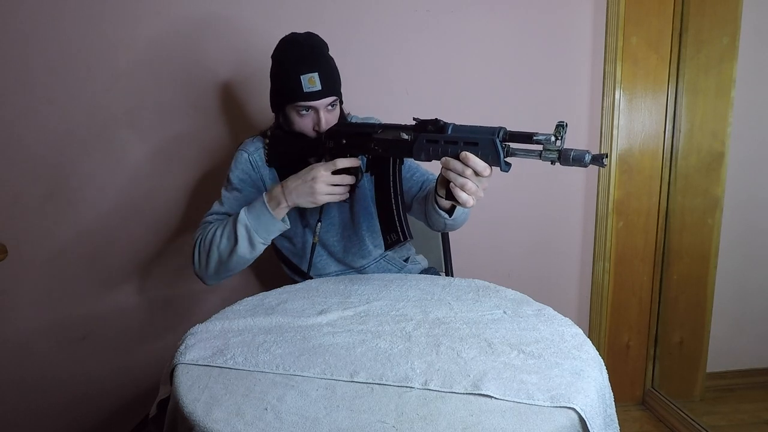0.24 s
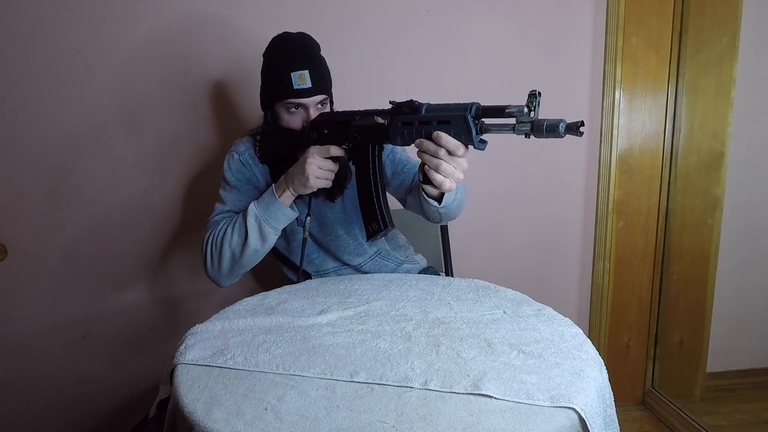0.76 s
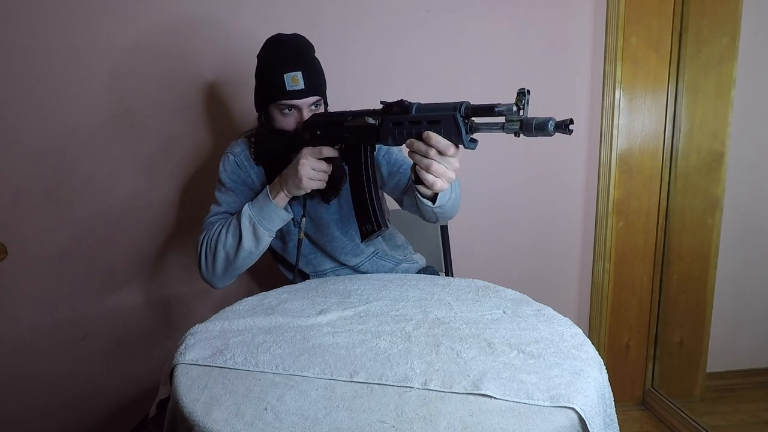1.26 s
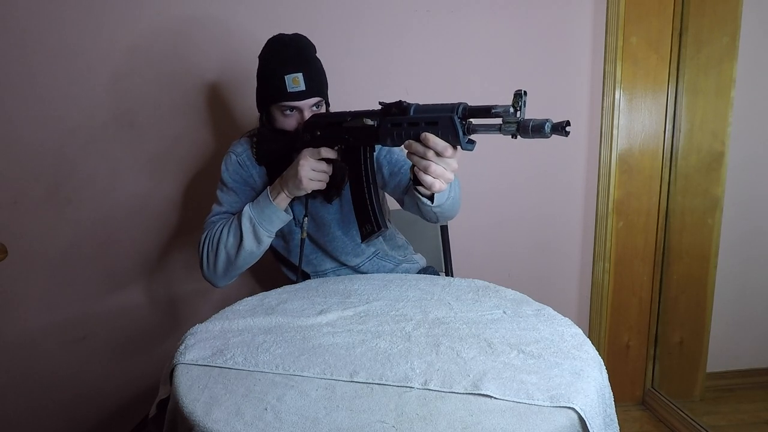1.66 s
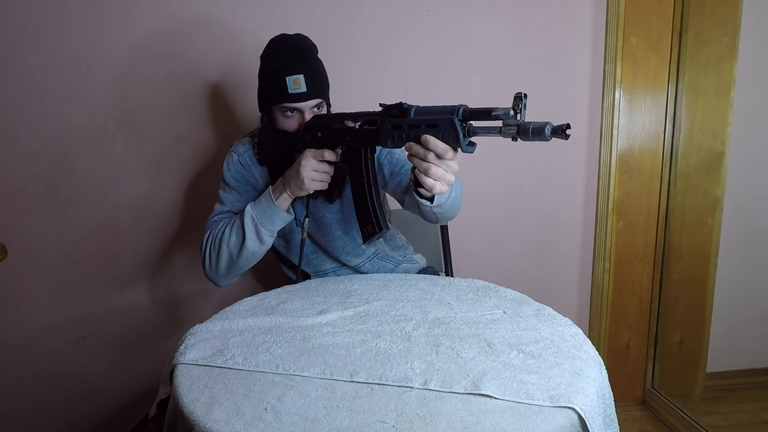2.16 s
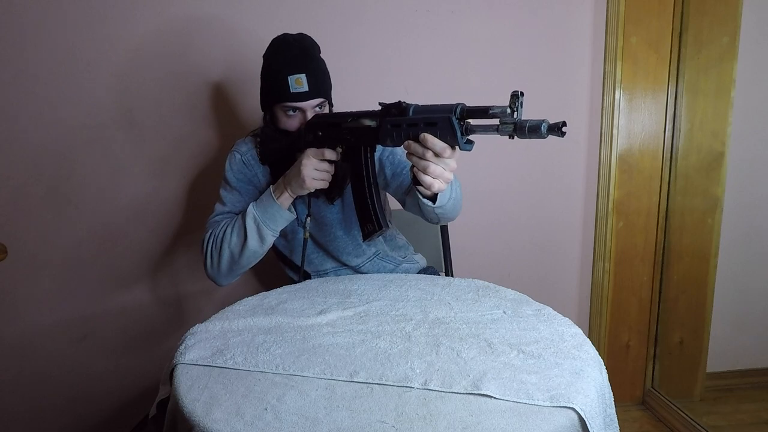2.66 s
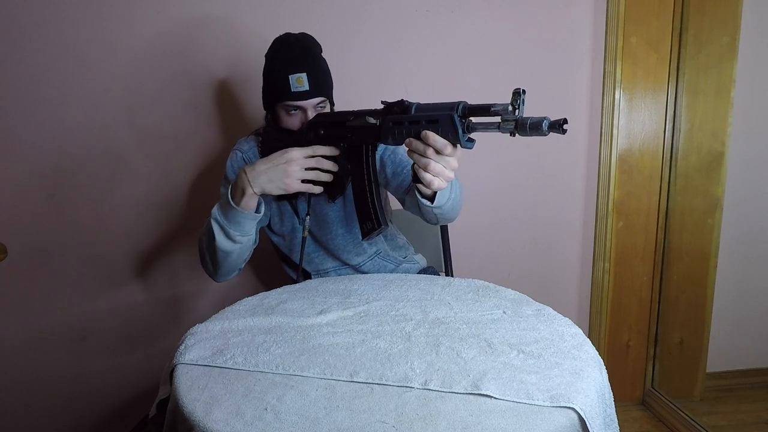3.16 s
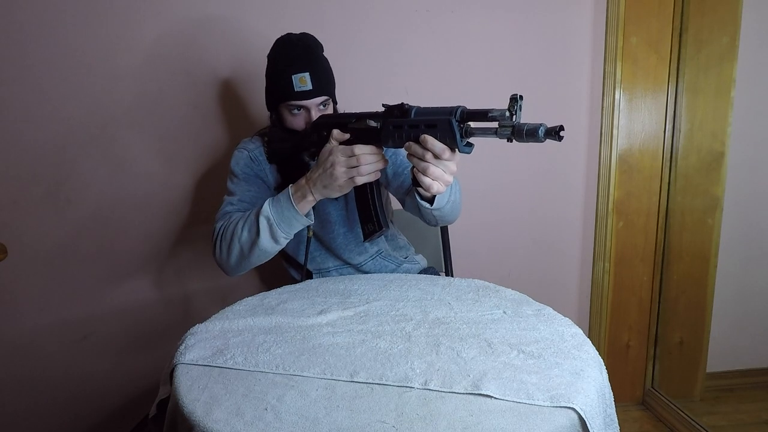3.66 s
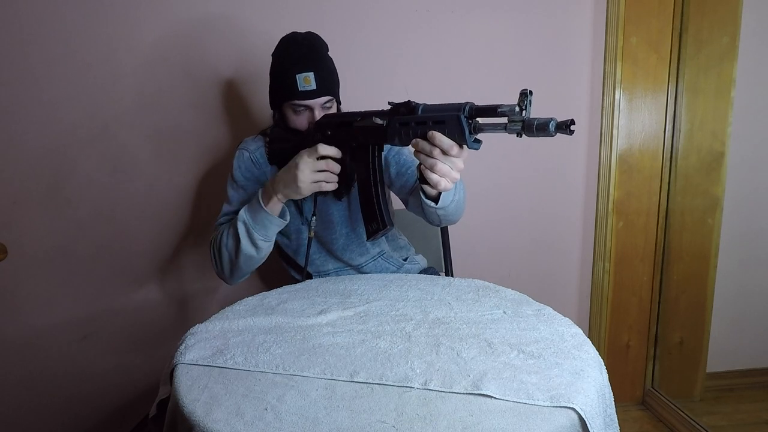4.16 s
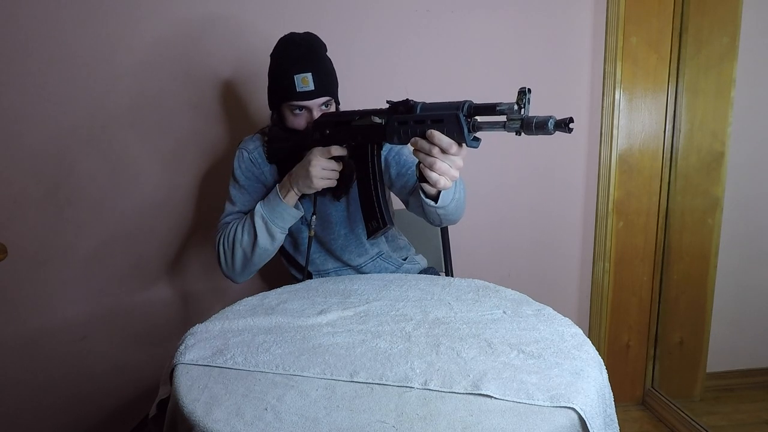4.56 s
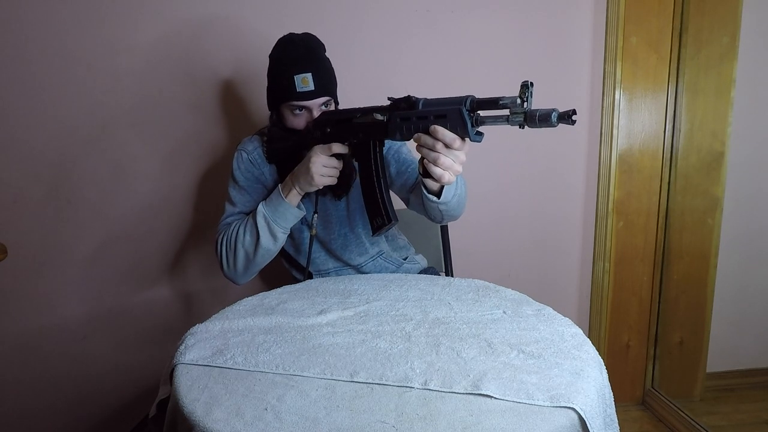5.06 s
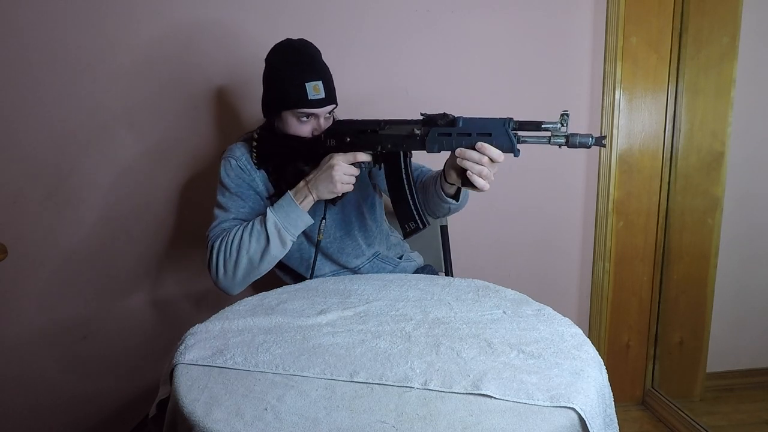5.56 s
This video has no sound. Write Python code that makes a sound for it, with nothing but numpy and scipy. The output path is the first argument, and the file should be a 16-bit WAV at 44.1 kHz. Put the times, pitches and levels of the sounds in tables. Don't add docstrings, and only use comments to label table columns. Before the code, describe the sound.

In a small bare room, hands knock a hollow plastic rifle stock, then a gas airsoft rifle fires three rapid bursts of four or five clattering shots. After a pause a selector lever snaps, followed by three quick single shots and one more. Close stereo camera microphone, overloaded by the cracks, with hiss that sinks after each blast.

```python
import sys
import numpy as np
from scipy import signal
from scipy.fft import rfft, irfft
from scipy.io import wavfile
from scipy.ndimage import uniform_filter1d

SR = 44100
rng = np.random.default_rng(int(sys.argv[2]) if len(sys.argv) > 2 else 0)


def invert_db(x):
    u = np.asarray(x, float) / 20
    return 10 ** u


def output_pcm(signal):
    pcm = np.clip(np.atleast_2d(signal).T, -1, 1) * 32767
    wavfile.write(sys.argv[1], SR, np.round(pcm).astype(np.int16))


N = 256220

# start_s, knock_db, crack_db
CYCLES = [(1.3202, 0.5, -1.5), (1.3949, -5.5, -2), (1.4685, -4.5, -1), (1.5423, -7, -1.5),
          (1.9556, -16, 0.5), (2.0300, -4.5, -1), (2.1035, -5.5, -3), (2.1765, -3.5, -4),
          (2.5657, -19.5, -1), (2.6401, -2.5, -2), (2.7146, -4.5, -4), (2.7876, -6, -3),
          (2.8613, -4.5, -2.5), (4.612, -0.5, -2.5), (4.8512, -13.5, 0.5), (5.0851, -12.5, 0.5),
          (5.7796, -9, 2)]
CRACK_LAG_S = .0180


def evened(x):
    return x / np.sqrt(np.mean(x ** 2) + 1e-20)


def read(points, hz):
    f, value = np.transpose(points)
    return np.interp(np.log(hz + 1), np.log(f + 1), value)


def add(mix, s, sound):
    part = mix[..., round(s * SR):][..., :sound.shape[-1]]
    part += sound[..., :part.shape[-1]]


def causal(spectrum):
    hz = abs(np.fft.fftfreq(4096, 1 / SR))
    log_gain = np.log(invert_db(np.maximum(read(spectrum, hz), -80)))
    return np.fft.ifft(np.exp(np.conj(signal.hilbert(log_gain)))).real[:1024]


def burst(colour, length_s, snap):
    t = np.arange(3000) / SR
    drive = np.zeros((2, 3000))
    drive[0] = rng.standard_normal(3000) * np.exp(-t / length_s)
    drive[0, 0] -= snap
    drive[1, 0] = np.linalg.norm(drive[0])
    sound = signal.fftconvolve(drive, colour[None], axes=1)
    return sound / abs(sound[0]).max()


def ring(modes, spread, phase, rise_s):
    t = np.arange(SR // 3)[:, None] / SR
    hz, db, t60 = np.transpose(modes)
    chance = rng.standard_normal((3, len(hz)))
    waves = np.sin(2 * np.pi * hz * (1 + spread * chance[0]) * t + phase * chance[1])
    levels = invert_db(db + 2.2 * chance[2] - 60 * t / t60)
    return (levels * waves).sum(1) * (1 - np.exp(-t[:, 0] / rise_s)) / 2


def ducking_db():
    step_db, most_db, fall_s, back_s = 17.5, 24, 0.26, 0.55
    age = np.maximum(np.arange(N)[::64, None] / SR - np.transpose(CYCLES)[0] - CRACK_LAG_S, 0)
    push = step_db * ((1 - np.exp(-age / fall_s)) * np.exp(-age / back_s)).sum(1)
    return np.repeat(most_db * np.tanh(push / most_db), repeats=64)[:N]


def wind_filter():
    off_s, fade_s = 1.6, 0.23
    return np.exp(-np.maximum(np.arange(N) / SR - off_s, 0) / fade_s)


def noise(spectrum, level_db):
    # pitch_hz, likeness
    likeness = [(60, 0.77), (180, -0.19), (550, -0.78), (1650, -0.59), (4970, 0.31), (15000, -1.2)]
    frames, hz = N // 256 + 5, np.fft.rfftfreq(1024, 1 / SR)
    a, b, c, d, patches = rng.standard_normal((frames, 513, 5)).T
    patches = evened(uniform_filter1d(uniform_filter1d(patches, 8, 0), 10, 1))
    same = np.clip(read(likeness, hz), -1, 1)[:, None]
    left = a + 1j * b
    z = np.array([left, same * left + np.sqrt(1 - same ** 2) * (c + 1j * d)])
    z *= invert_db(read(spectrum, hz)[:, None] + 0.5 * patches)
    return invert_db(level_db) * evened(signal.istft(z, nperseg=1024, noverlap=768)[1][:, :N])


def room_noise():
    # pitch_hz, level_db (per Hz)
    hiss = [(53, -77.5), (90, -57), (138, -26.5), (165, -1), (204, -9.5), (288, -10), (527, -14.5),
            (1690, -23.5), (3220, -31), (3820, -31), (4260, -31.5), (5510, -34), (6270, -28.5),
            (12500, -37), (15500, -56.5)]
    # pitch_hz, level_db (per Hz)
    rumble = [(12, -35), (20, -6.5), (81, -11.5), (119, 3.5), (133, -4), (146, -20), (200, -34),
              (260, -44.5), (440, -120)]
    duck = ducking_db()
    rumble_db = -56.5 + 9 * (1 - wind_filter()) - 0.48 * duck
    return noise(hiss, -40.0 - duck) + noise(rumble, rumble_db)


def hammer_knock(length_s, snap):
    # pitch_hz, level_db (per Hz)
    hammer_colour = [(180, -52), (400, -7), (800, -5), (1300, 5.5), (2300, -4.5), (3000, -16), (3800, -10),
                     (5500, -16.5), (7500, -6.5), (9500, -33.5), (14000, -36)]
    return burst(causal(hammer_colour), length_s, snap)


def stock_knocks(bright):
    # start_s, level_db
    knocks = [
        (0.001, -17.5),
        (.073, -13),
        (0.0803, -6),
        (.099, -16.5),
    ]
    # pitch_hz, level_db, t60_s
    stock = [(460, -18, .03), (790, -2, .05), (862, 0, .07), (1050, -2, .05), (1200, -9, .03),
             (1350, -7, .03), (1570, -5, .07), (1700, -3, .05), (1950, -8, .03), (2230, -5, .04),
             (2400, -8, .03), (2620, -10, .03), (3000, -12, .03), (3450, -14, .03)]
    for s, db in knocks:
        add(bright, s, invert_db(db) * ring(stock, .005, 3.0, .0015) * invert_db([[0], [-4.0]]))
        add(bright, s, invert_db(db - 11.0) * hammer_knock(0.022, 1.5))


def small_ticks(bright):
    # start_s, level_db, centre_hz, width_hz, length_s
    ticks = [(.001, -34.5, 4450, 5970, 0.069), (0.074, -17.5, 5240, 5750, 0.0064),
             (5.444, -46, 494, 498, 0.03), (0.268, -26, 870, 605, 0.012), (0.387, -39.5, 1151, 1500, 0.093),
             (.509, -36, 1670, 2500, 0.024), (1.306, -15, 5860, 4020, 0.029),
             (1.945, -33.5, 6500, 3140, 0.015), (2.555, -36, 6080, 3000, 0.0048),
             (3.617, -56, 1080, 598, 0.018), (4.072, -49.5, 927, 70, 0.0071),
             (3.825, -48, 700, 900, 0.0042), (4.615, -8, 2600, 1210, 0.0035),
             (1.317, -11.5, 2670, 1500, 0.0024), (4.173, -41.5, 4760, 3500, 0.031),
             (4.178, -33.5, 1700, 800, 0.0094), (4.192, -40, 2150, 250, 0.0027),
             (4.372, -41, 1200, 1220, 0.013), (4.591, -15.5, 5180, 6100, 0.012),
             (5.752, -36, 5020, 6070, 0.011), (5.763, -30.5, 2950, 5000, 0.011)]
    t = np.arange(512) / SR
    for s, db, hz, width_hz, length_s in ticks:
        band = np.exp(-np.pi * width_hz * t) * np.cos(2 * np.pi * hz * t + 0.15)
        add(bright, s, invert_db(db) * burst(np.convolve(band, band), length_s, 0.98))


def chair_bumps(low):
    # start_s, level_db, pitch_hz, t60_s
    bumps = [
        (.23, -31, 167, 0.12),
        (0.397, -24.5, 161, 0.51),
        (0.522, -35.5, 164.6, 0.69),
        (0.818, -40, 172, 0.48),
        (4.48, -37.5, 174.5, 0.66),
        (5.449, -35, 267.4, 0.19),
        (5.449, -23.5, 169.5, 0.262),
        (5.469, -31, 166.3, 0.48),
        (5.454, -35.5, 76.9, 0.82),
    ]
    fade = np.hanning(2 * (SR // 3))[SR // 3:]
    for s, db, hz, t60 in bumps:
        add(low, s, 2 * invert_db(db) * ring([(hz, 0, t60)], 0.026, 0.036, 0.017) * fade)


def selector_clicks(bright):
    # start_s, level_db, length_s
    snaps = [
        (3.811, -24, 0.039),
        (3.8252, -1, 0.002),
        (3.833, -5.5, 0.0032),
    ]
    # pitch_hz, level_db (per Hz)
    selector_colour = [(180, -66.5), (300, -22.5), (979, -16), (1340, -20.5), (1990, -14), (3050, -21),
                       (4110, -10.5), (5130, -20.5), (5460, -6), (6100, 3), (6600, -10), (7490, -3.5),
                       (8360, -22), (9340, -13), (11000, -29.5), (14000, -30)]
    for s, db, length_s in snaps:
        add(bright, s, invert_db(db) * burst(causal(selector_colour), length_s, 0.73))


def handling():
    bright, low = np.zeros((2, N)), np.zeros(N)
    small_ticks(bright)
    selector_clicks(bright)
    stock_knocks(bright)
    chair_bumps(low)
    return signal.sosfilt(signal.butter(3, 350, "high", fs=SR, output="sos"), bright), low


def gas_crack():
    # pitch_hz, level_db (per Hz)
    crack_colour = [(180, -41.5), (300, -26.5), (462, -4.5), (1080, -16.5), (1460, -7), (4230, -11),
                    (4670, -7.5), (6100, -1.5), (6620, -12.5), (11300, -14), (16000, -32.5)]
    return burst(causal(crack_colour), .0015, 7.0)


def body_thump(phase, rise_s):
    # pitch_hz, level_db, t60_s
    body = [(56.5, -18, 0.27), (157, -11, 0.27), (189.6, -0.5, 0.089), (207.5, 0, 0.079),
            (240.5, -2.5, 0.16), (281.9, -4, 0.15), (230, -4.5, 0.029)]
    return ring(body, 0.02, phase, rise_s)


def bolt_ring(rise_s, long_only=False):
    # pitch_hz, level_db, t60_s
    steel = [(5390, -7, .03), (5620, -6, .04), (5935, 0, .09), (6030, -4, .06), (6110, -4, .05),
             (6280, -6, .04), (6930, -9, .03), (7350, -8, .03), (7480, -4, .06), (7535, -3, .08),
             (7820, -6, .03), (8200, -9, .02)]
    modes = steel[2:5] + steel[8:10] if long_only else steel
    sound = ring(modes, 0.003, 2.4, rise_s)
    clang = np.exp(-np.arange(len(sound)) / SR / .002)
    return np.array([sound, invert_db(4.0) * clang * sound])


def bolt_slam():
    # pitch_hz, level_db (per Hz)
    slam_colour = [(180, -41), (300, -18), (609, -15), (940, -8.5), (2030, -9.5), (3460, -14.5),
                   (3930, -9.5), (5600, -10), (6070, -3.5), (10000, -17.5), (14000, -30)]
    return burst(causal(slam_colour), .003, 2.6)


def rifle():
    # start_s, ring_db, slam_db
    bolts = [(1.3801, -6, -7), (1.4562, 1.5, -5), (1.5305, -5.5, -5), (1.6050, 1.5, -3), (2.0158, -4, -3.5),
             (2.0924, 2, -3.5), (2.1670, -4.5, -4), (2.2409, 1, -5), (2.6273, -0.5, -5.5),
             (2.7008, 0.5, -5), (2.7739, -2.5, -6.5), (2.8508, 1.5, -7), (2.922, -3.5, -3.5),
             (4.673, -1.5, -3.5), (4.9113, 1.5, -2.5), (5.1458, -2, -1.5), (5.8400, -3, -5)]
    bright, low, duck = np.zeros((2, N)), np.zeros(N), ducking_db()
    crack_room, hammer_room = invert_db([[0], [-5.5]]), invert_db([[0], [-6.5]])
    next_starts = [cycle[0] for cycle in CYCLES[1:]] + [np.inf]
    place = 0
    for (s, knock_db, crack_db), (rings, ring_db, slam_db), then in zip(CYCLES, bolts, next_starts):
        last = then - s > .1
        down_db = duck[round(s * SR)]

        rebound_db = knock_db - 10
        add(bright, s, invert_db(knock_db) * hammer_room * hammer_knock(0.0014, 32.0))
        add(bright, s + .0082, invert_db(rebound_db + 4.5) * hammer_room * hammer_knock(0.0069, 0.5))

        fired = s + CRACK_LAG_S - .00035 * place
        valve_opens = fired - 0.00058
        add(bright, fired, invert_db(crack_db + 7.0) * crack_room * gas_crack())
        add(low, valve_opens, invert_db(-4 - 0.46 * down_db) * body_thump(.2, 0.0022))

        shut = rings + .0155 if last else then - .0012
        close_db = -14.5 if last else 2.65 - 0.54 * down_db
        again_db = -8.5 if last else -12
        add(bright, rings, invert_db(ring_db - 4.5) * bolt_ring(0.00069))
        add(low, rings + .0085, invert_db(close_db) * body_thump(0.18, 0.0057))
        add(bright, shut, invert_db(slam_db) * bolt_slam())
        add(bright, shut, invert_db(again_db) * bolt_ring(0.00062, long_only=True))
        place = 0 if last else place + 1
    return bright, signal.sosfiltfilt(signal.butter(3, 340, fs=SR, output="sos"), low)


def room(x):
    # pitch_hz, t60_s
    decay = [(300, 0.39), (700, 0.41), (1800, 0.42), (4800, 0.38), (9000, 0.34), (12000, 0.29),
             (15000, 0.43)]
    # pitch_hz, likeness
    echo_likeness = [(150, 0.94), (400, 0.74), (800, 0.22), (3000, 0.53), (8000, 0.067)]
    turn, out = np.arange(N) / SR * 2 * np.pi * 4.3, np.zeros((2, N))
    for k in range(3):
        taps = np.zeros((2, 30000))
        at = np.arange(100, 29900, 20) + rng.integers(0, 20, (2, 1490))
        np.put_along_axis(taps, at, rng.choice([-1., 1.], at.shape), 1)
        hz, t, z = signal.stft(taps, SR, nperseg=256)
        alike = np.clip(read(echo_likeness, hz), -1, 1)[:, None]
        z = np.array([z[0], alike * z[0] + np.sqrt(1 - alike ** 2) * z[1]])
        tail = signal.istft(z * invert_db(-60 * t / read(decay, hz)[:, None]), SR, nperseg=256)[1]
        tail *= 1 - np.exp(-np.arange(tail.shape[1]) / SR / 0.00077)
        share = np.sqrt(2 / 3) * abs(np.cos(turn / 2 + k * np.pi / 3))
        out += signal.fftconvolve((x * share)[None], tail / np.linalg.norm(tail[0]), axes=1)[:, :N]
    return out


def scene():
    shots, thumps = rifle()
    ticks, bumps = handling()
    floor = room_noise()
    echoes = room(invert_db(8.0) * shots[1] + invert_db(0.5) * ticks[1] + invert_db(-12.5) * thumps)
    return shots[0] + ticks[0] + thumps + bumps + echoes + floor


def microphone(dry):
    # pitch_hz, left_over_right_db
    tilt = [(60, -5.5), (130, -3.5), (290, 0.5), (640, -0.5), (1410, 0), (3100, 0), (6820, 0.5),
            (15000, -3.5)]
    # pitch_hz, lead_rad
    lead = [(100, 0.26), (1500, 0.11), (4480, -0.11), (4910, 0.051), (5940, 1.3), (6460, -0.19),
            (11300, -1.1), (15900, 0.63)]
    hz = np.fft.rfftfreq(N, 1 / SR)
    half = invert_db(read(tilt, hz) / 2) * np.exp(.5j * read(lead, hz))
    edge = 1 / np.sqrt(1 + (hz / 15700) ** 16)
    ports = rfft(dry) * np.array([half, 1 / half]) * edge
    bass_cut = irfft(ports * invert_db(-17.0 / (1 + (hz / 112) ** 8)), N)
    share = wind_filter()
    return np.clip(share * bass_cut + (1 - share) * irfft(ports, N), -1, 1)


def treble_gate(x):
    # pitch_hz, level_db
    gate = [(2500, -49.5), (7000, -53.5), (9500, -48.5), (11500, -44), (13500, -44), (15000, -38),
            (16000, -32.5)]
    pad = 229
    hz, t, z = signal.stft(np.pad(x, [(0, 0), (pad, 0)]), SR, "cosine", nperseg=2048, noverlap=1024)
    power = abs(z) ** 2
    wander_db = 7.6 * np.repeat(rng.standard_normal((len(t), 33)).T, repeats=32, axis=0)[:len(hz)]
    loudness = power[:, hz > 700].sum(1, keepdims=True)
    mask = loudness * invert_db(2 * (read(gate, hz)[:, None] + wander_db)) + invert_db(-226.0)
    kept = z * ((power > mask) | (hz < 2500)[:, None])
    return signal.istft(kept, SR, "cosine", nperseg=2048, noverlap=1024)[1][:, pad:pad + N]


def top_cut(x):
    return signal.sosfilt(signal.butter(12, 16400, fs=SR, output="sos"), x)


def record(dry):
    mix = treble_gate(microphone(dry))
    return top_cut(mix)


dry = scene()
out = record(dry)
output_pcm(out)
```